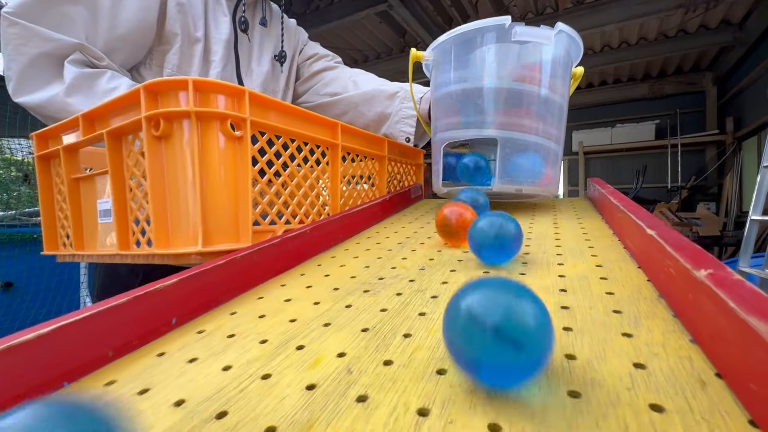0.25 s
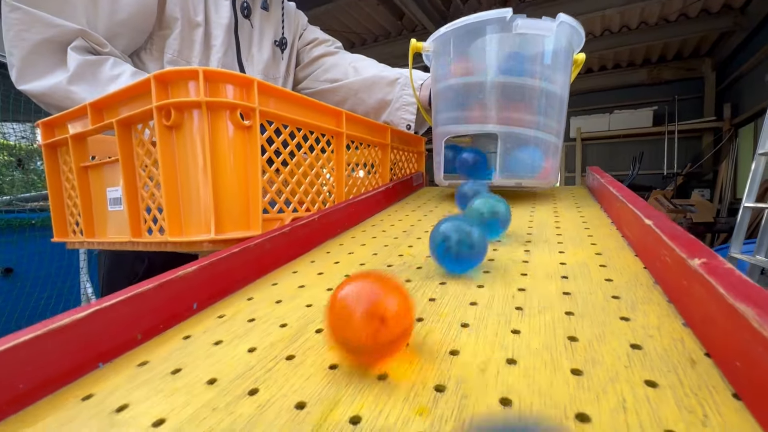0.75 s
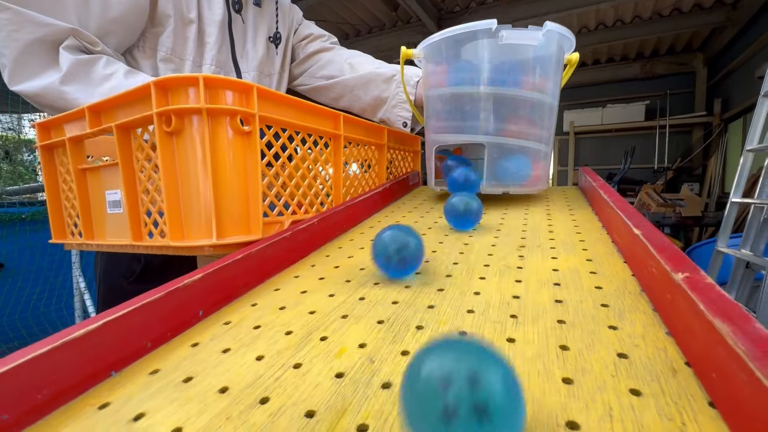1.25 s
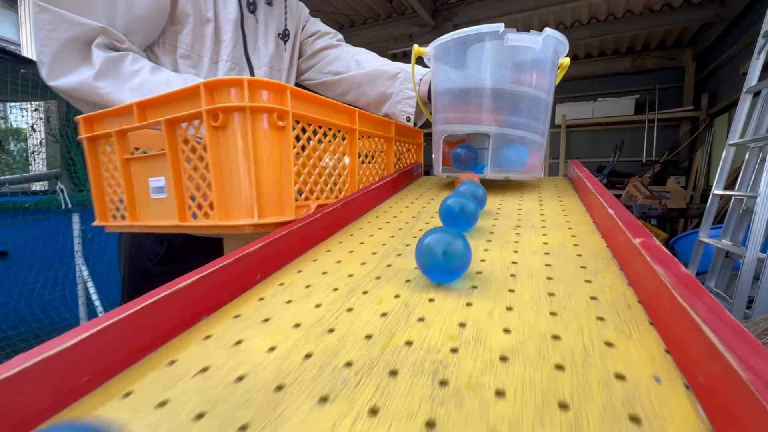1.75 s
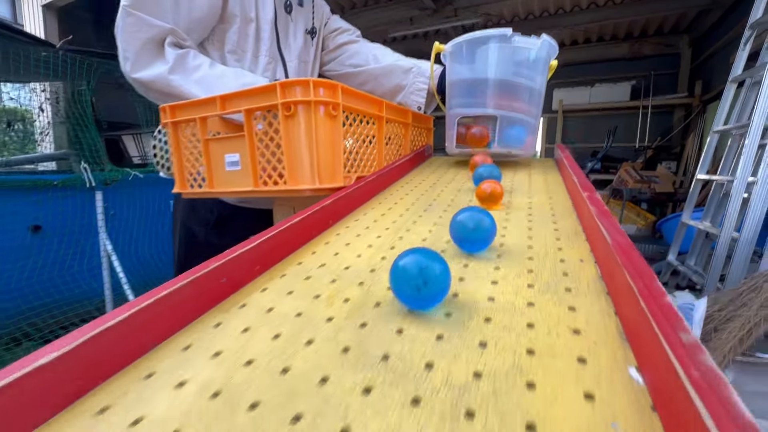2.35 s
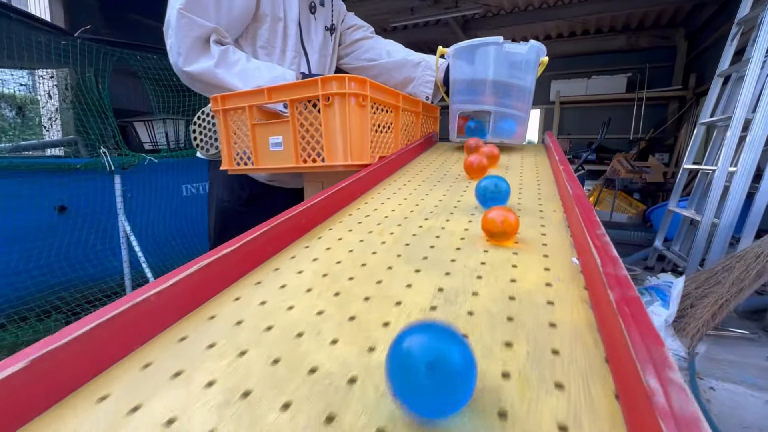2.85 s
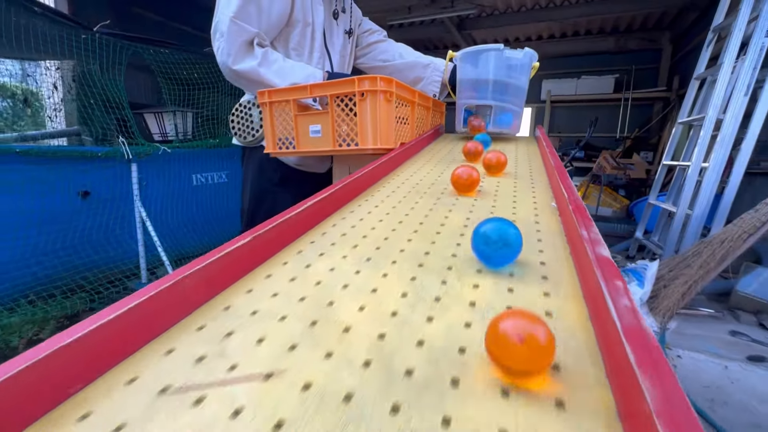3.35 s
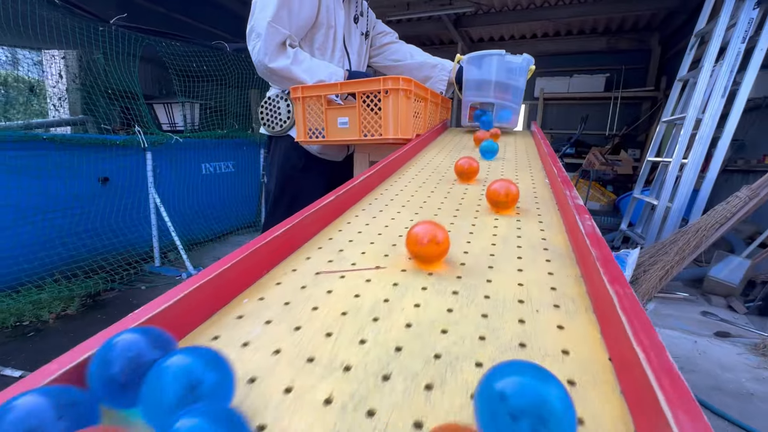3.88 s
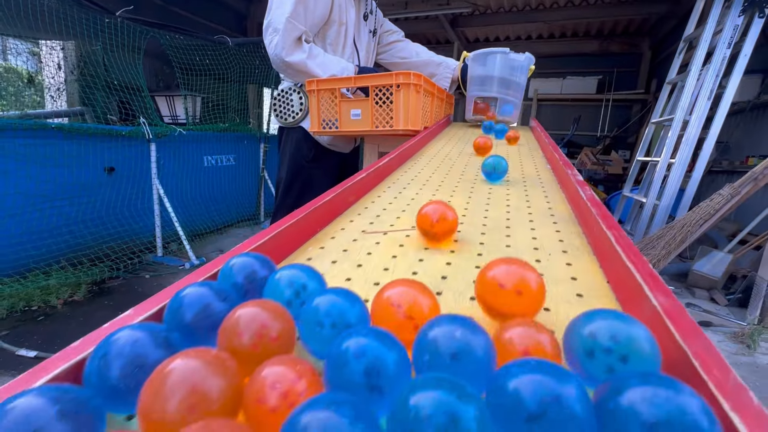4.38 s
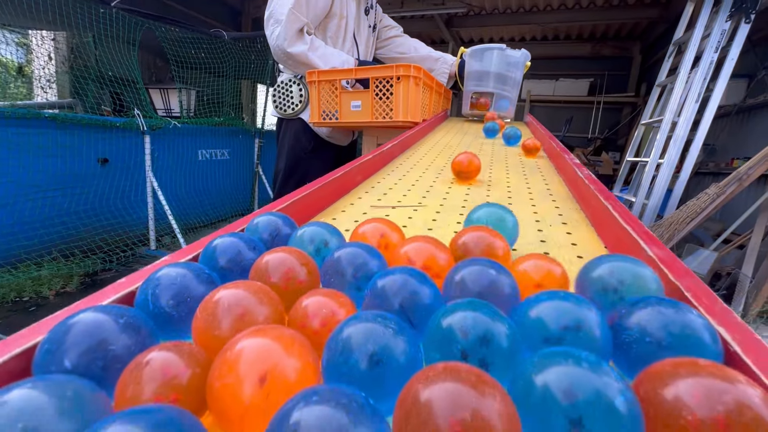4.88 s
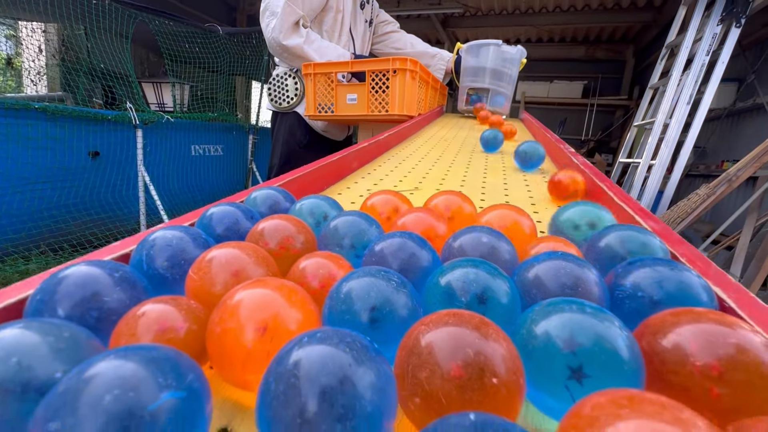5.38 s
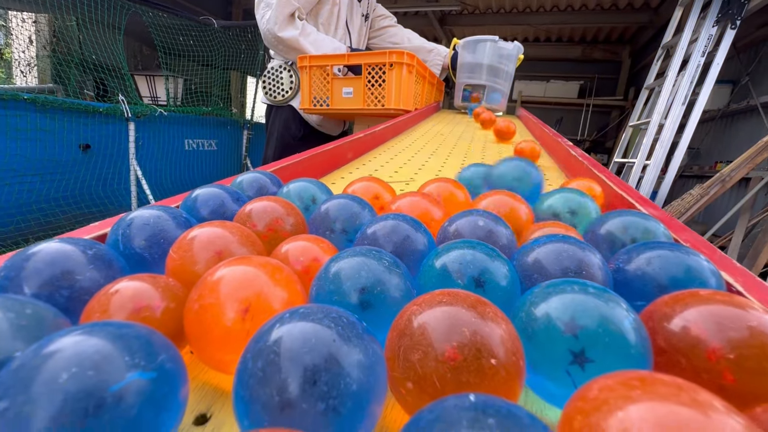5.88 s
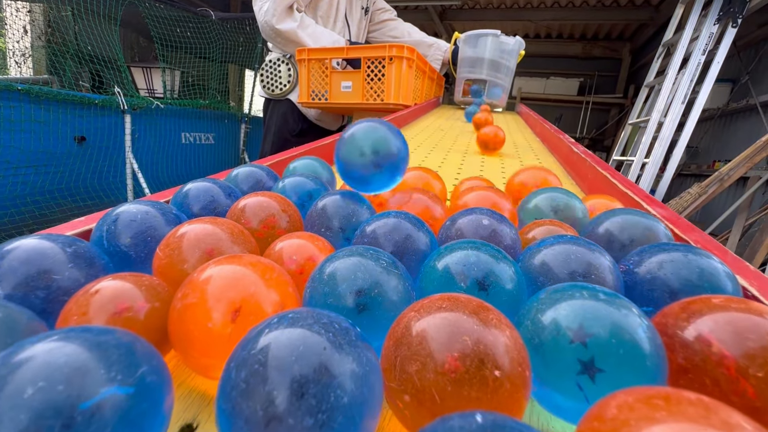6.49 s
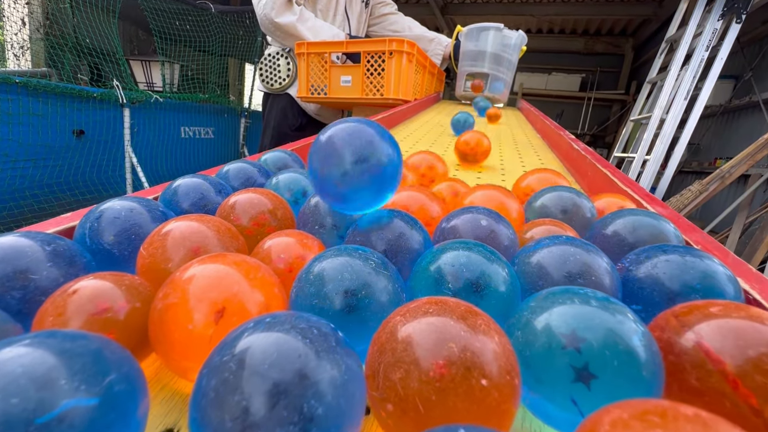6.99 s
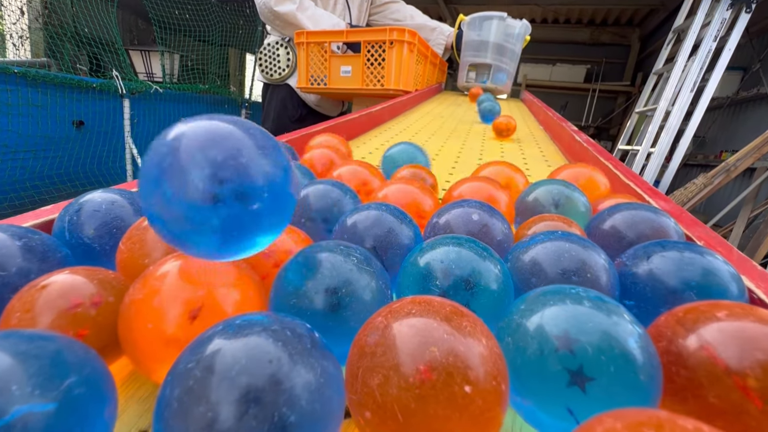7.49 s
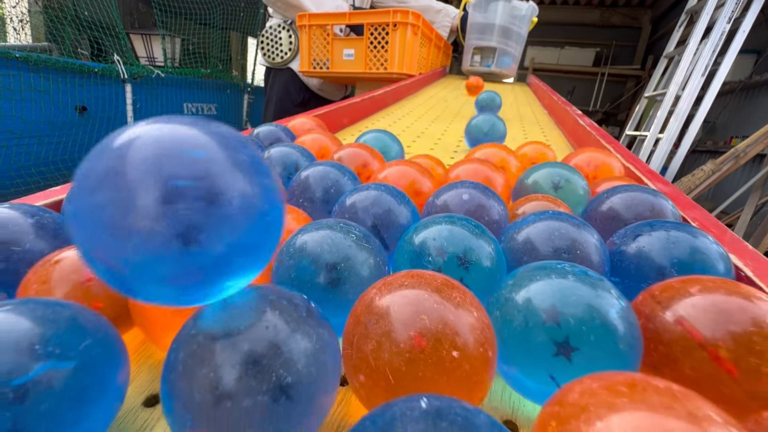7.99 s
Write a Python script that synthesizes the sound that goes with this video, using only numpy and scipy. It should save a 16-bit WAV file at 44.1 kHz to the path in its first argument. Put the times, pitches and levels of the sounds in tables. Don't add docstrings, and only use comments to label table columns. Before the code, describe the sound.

Close at the foot of a perforated wooden board in an open shed, hollow hard plastic balls roll down and collide. From 0 s, crisp cracks and hollow tocks burst out at about 0.04, 0.2 and 0.5 s over a low rumble, rattling roll and faint hiss. Until 3 s, separate sharp clacks and short chattering chains come irregularly, with brief gaps filled by rolling and light ticks; some ring high and thin, others knock low. From 3 to 4 s the pile closes in and the rumble fades back. Between 4 and 6 s, hits crowd together, fuller and woodier, with board thuds. Strong clusters continue around 6.1, 6.4 and 6.75 s, then spacing loosens through 7 to 8 s. Near 8.1 s a hard clack comes with a soft low bump on the microphone. Short, faint room reverberation; wide, uneven stereo; subdued top treble.

```python
import sys
import numpy as np
from scipy import signal
from scipy.fft import rfft, irfft, next_fast_len
from scipy.io import wavfile
from scipy.ndimage import uniform_filter1d, minimum_filter1d, map_coordinates

SR = 44100
rng = np.random.default_rng(int(sys.argv[2]) if len(sys.argv) > 2 else 0)


def inscribe(sig):
    pcm = np.round(np.clip(np.atleast_2d(sig).T, -1, 1) * 32767)
    wavfile.write(sys.argv[1], SR, pcm.astype(np.int16))


def level_to_linear(level):
    exponent = np.asarray(level, float) / 20
    return 10 ** exponent


N = 363384

# frequency in Hz, level in dB.
SURFACE = [(900, -12.5), (1700, -6), (3000, -15), (4100, -25), (5000, -31), (5700, -25.5), (6300, -31.5),
           (7200, -37.5), (8200, -36), (9400, -38.5), (10100, -72), (14000, -120)]
# frequency in Hz, left minus right in dB.
LEAN = [(25, 5.5), (150, 8.5), (400, 8.5), (980, -2.5), (1720, 0.5), (3000, 6.5), (5200, 2)]


def unit(x):
    return x / np.sqrt(np.mean(x ** 2) + 1e-20)


def along(points, hz):
    f, v = np.transpose(points)
    return np.interp(np.log(hz + 1), np.log(f + 1), v)


def filtered(x, response):
    m = next_fast_len(x.shape[-1] + 4096)
    spectrum = rfft(x, m) * response(np.fft.rfftfreq(m, 1 / SR))
    return irfft(spectrum, m)[..., :x.shape[-1]]


def resonance(f, hz, width_hz):
    return 1j * f * width_hz / (hz * hz - f * f + 1j * f * width_hz)


def modes(table):
    def response(f):
        return sum((-1) ** k * level_to_linear(db) * resonance(f, hz, width_hz)
                   for k, (hz, width_hz, db) in enumerate(table))
    return response


def causal(points):
    def response(f):
        cepstrum = irfft(np.log(level_to_linear(along(points, f)) + 1e-4))
        cepstrum[1:len(f) - 1] *= 2
        cepstrum[len(f):] = 0
        return np.exp(rfft(cepstrum))
    return response


def weighed(x, db):
    energy = np.sum(x ** 2, axis=(1, 2), keepdims=True) / 2 / SR
    return x / np.sqrt(energy) * level_to_linear(db)[:, None, None]


def laid(s, sounds):
    out = np.zeros((2, N + SR))
    for start, sound in zip(np.round(s * SR).astype(int), sounds):
        out[:, start:start + sound.shape[1]] += sound
    return out[:, :N]


def shaded(s):
    pile_near_s, pile_takes_s = 3.86, 0.22
    return 1 / (1 + np.exp((pile_near_s - s) / pile_takes_s))


def contacts():
    # start in seconds, clack energy in dB, shell pitch in Hz, chain length in ms.
    clean_hits = [(0.04, -30, 1136, 31), (0.21, -27.5, 557, 130), (0.254, -31.5, 1200, 13),
                  (0.371, -35.5, 520, 170), (0.7145, -29.5, 1980, 14), (1.031, -31, 610, 24),
                  (1.374, -46, 520, 33), (1.892, -37.5, 546, 8.7), (2.424, -31, 1410, 11),
                  (2.885, -44, 1570, 5.7), (2.896, -33, 1680, 23), (3.198, -39.5, 1320, 16),
                  (3.163, -35, 1760, 12), (6.364, -40, 450, 32), (6.462, -31, 697, 17),
                  (6.738, -28.5, 1020, 21), (6.831, -29.5, 966, 16), (7.329, -35.5, 1015, 10)]
    clean_shoves = [(0.466, -48.5, 710, 52), (0.506, -25.5, 694, 32), (1.145, -32.5, 1660, 5.6),
                    (1.165, -28.5, 1220, 3.5), (1.202, -43.5, 585, 15), (1.453, -40, 1360, 3.4),
                    (1.56, -31, 552, 22), (1.876, -40.5, 550, 11), (2.097, -32, 1500, 13),
                    (2.249, -32.5, 1450, 11), (2.349, -32, 930, 30), (2.502, -40, 546, 43),
                    (3.298, -35, 1740, 2.7), (3.302, -30.5, 1330, 5.4), (3.331, -33.5, 535, 21),
                    (5.673, -31, 1420, 10), (6.123, -25, 1110, 20), (7.165, -26.5, 1037, 15),
                    (7.445, -42.5, 460, 16), (7.938, -38.5, 487, 13), (8.193, -39, 540, 15)]
    pile_hits = [(0.586, -44, 974, 32), (0.752, -30, 585, 91), (0.95, -32, 1780, 11), (1.463, -39, 573, 43),
                 (1.684, -39.5, 535, 56), (1.827, -27.5, 1690, 14), (2.019, -36, 934, 47),
                 (2.115, -37, 1270, 29), (2.207, -32, 2040, 23), (2.829, -29.5, 1210, 23),
                 (3.609, -33, 1070, 16), (3.669, -35.5, 1780, 15), (3.722, -29, 964, 25),
                 (3.807, -35, 530, 12), (4.133, -26.5, 1000, 41), (4.227, -27, 1070, 31),
                 (4.363, -36.5, 993, 11), (5.1, -28, 1066, 22), (5.516, -30, 1540, 13),
                 (5.883, -27.5, 1060, 13), (6.393, -26, 1017, 42), (6.513, -29.5, 1550, 14),
                 (6.562, -31, 983, 25), (6.87, -30, 856, 40), (6.926, -33.5, 710, 19), (7.128, -30, 800, 9),
                 (7.501, -28.5, 940, 13), (7.696, -41.5, 550, 24), (8.1115, -29, 1090, 16)]
    pile_shoves = [(0.907, -36.5, 520, 49), (0.927, -47, 640, 26), (1.322, -32, 1185, 28),
                   (1.777, -31.5, 1205, 33), (2.076, -29, 1870, 13), (2.58, -34.5, 955, 27),
                   (3.127, -31, 1330, 30), (3.369, -44, 630, 10), (3.578, -40, 700, 7.1),
                   (3.758, -26, 1550, 25), (3.957, -30, 914, 11), (4.104, -41.5, 1070, 24),
                   (4.47, -24.5, 885, 20), (4.502, -28.5, 930, 17), (4.759, -26.5, 1006, 25),
                   (4.844, -28, 1265, 7.8), (4.981, -55, 503, 13), (5.248, -36, 943, 11),
                   (5.265, -32, 990, 15), (5.429, -27.5, 990, 15), (5.591, -36, 940, 14),
                   (5.65, -28, 1235, 15), (5.789, -28.5, 1140, 15), (5.826, -34.5, 1220, 22),
                   (5.94, -29.5, 994, 20), (6.237, -32.5, 940, 19), (6.53, -30, 1040, 18),
                   (7.092, -49, 505, 27), (7.562, -33, 1200, 23), (7.619, -39.5, 468, 17)]
    drops = [(0.173, -37, 563, 79), (0.311, -44, 537, 73), (0.432, -53, 480, 31), (1.088, -62, 577, 16),
             (1.221, -42.5, 500, 33), (2.913, -35, 1630, 12), (2.968, -40.5, 1130, 19),
             (3.42, -32.5, 1320, 24), (3.853, -48, 520, 15), (3.911, -34.5, 850, 11),
             (3.976, -38.5, 880, 7.8), (4.328, -26, 1070, 38), (4.543, -30, 1140, 18),
             (5.214, -31, 1420, 10), (5.617, -38, 935, 18), (5.905, -33, 767, 18), (6.05, -37, 762, 29),
             (6.207, -31, 1134, 12), (7.371, -31, 770, 12), (7.752, -33.5, 624, 15),
             (7.875, -35.5, 1010, 16)]
    settles = [(0.145, -42.5, 594, 13), (2.726, -41, 456, 24), (2.995, -49.5, 470, 47),
               (3.178, -43.5, 1480, 14), (3.218, -38, 1110, 29), (3.269, -38.5, 890, 30),
               (3.388, -41.5, 523, 57), (4.058, -57, 505, 43), (4.174, -29.5, 770, 23),
               (4.565, -32, 1105, 27), (4.624, -35, 1074, 16), (4.928, -34, 983, 31), (5.481, -37, 570, 14),
               (6.906, -34, 973, 6.7), (7.2, -31.5, 1100, 27), (7.298, -38.5, 467, 7.9),
               (7.523, -36, 1750, 13)]
    hit_rise, shove_rise = 0.17, 0.55
    clean_db, pile_db, drop_db = -7.5, -2, 2.5
    kinds = [(clean_hits, hit_rise, clean_db), (clean_shoves, shove_rise, clean_db),
             (pile_hits, hit_rise, pile_db), (pile_shoves, shove_rise, pile_db),
             (drops, hit_rise, drop_db), (settles, shove_rise, drop_db)]
    return np.transpose([(s, db, hz, thud_db, rise * ms * 1e-3, (1 - rise) * ms * 1e-3)
                         for table, rise, thud_db in kinds for s, db, hz, ms in table])


def chains(rise_s, fall_s, density, scatter_db):
    rise, fall = (np.clip(v, .0003, .04)[:, None, None] for v in (rise_s, fall_s))
    age = np.arange(SR // 8) / SR
    draw = rng.random((len(rise), 3, 2, SR // 8))
    main = np.abs(age - rise) <= .5 / SR
    force = level_to_linear(-scatter_db * np.log(draw[:, 1] + 1e-3)) * np.sign(draw[:, 2] - .5)
    before = 0.67 + 0.52 * (age / rise) ** 1.8
    after = np.exp(-np.abs((age - rise) / fall) ** 1.09)
    swell = np.where(age < rise, before, after)
    return swell * (force * (draw[:, 0] < density / SR) + 0.53 * main)


def arrivals():
    # frequency in Hz, width in Hz, level in dB.
    board_modes = [(81, 30, -13.5), (202.8, 101, -5.5), (330, 132.4, 4), (414, 169, 3)]
    pile_modes = [(520, 120, 3), (1070, 416, 8), (1740, 360, 3.5)]
    open_modes = [(520, 28, 7), (820, 480, -4.5), (1287, 97, -1), (2000, 3000, 4.5)]
    s, db, hz, thud_db, rise_s, fall_s = contacts()
    pitch = hz[:, None, None]
    near = shaded(s)[:, None, None]
    spread = np.clip((rise_s + fall_s) / .016, .15, 1)[:, None, None]
    lone_width, chain_width = .3, 0.71
    width = lone_width + (chain_width - lone_width) * spread

    def soft(f, corner_hz):
        return 1 / (1 + 1j * f / corner_hz) ** 4

    def ring(f, hz):
        return resonance(f, hz, width * hz) ** 2

    def shell(f):
        tock = soft(f, 2410) * (ring(f, pitch) - 0.24 * ring(f, 1.4 * pitch))
        hollows = near * modes(pile_modes)(f) + (1 - near) * modes(open_modes)(f)
        return 2.47 * tock + spread * soft(f, 1610) * hollows

    def board(f):
        return soft(f, 750) * modes(board_modes)(f)

    clack_chain = chains(rise_s, fall_s, 2000 * spread, scatter_db=2.5)
    thud_chain = chains(rise_s + 0.0014, 0.95 * fall_s, 500, scatter_db=1.0)
    tick_chain = chains(0.92 * rise_s, 1.2 * fall_s, 5400, scatter_db=4.0)
    clack = weighed(filtered(clack_chain, shell), db - 3.5)
    thud = weighed(filtered(thud_chain, board), db + thud_db - 8)
    tick = weighed(filtered(tick_chain, causal(SURFACE)), db - 25.0)
    return laid(s, clack + thud + tick)


def tocks():
    # time of the peak in seconds, peak in dB, pitch in Hz.
    strays = [
        (0.038, -12.5, 4620),
        (0.213, -18, 4800),
        (0.508, -11, 3410),
        (5.382, -26, 1460),
        (5.4416, -8, 900),
    ]
    shell_tocks = [(0.0394, -7.5, 3130), (0.0399, -9, 2280), (0.055, -21, 1600), (0.059, -16, 1180),
                   (0.214, -15, 2990), (0.22, -13.5, 980), (0.2182, -14, 3050), (0.227, -10, 1246),
                   (0.229, -11.5, 2300), (0.2296, -14.5, 1625), (0.259, -15, 1730), (0.2619, -12, 2225),
                   (0.2634, -9, 1360), (0.5093, -22, 1400), (0.509, -13, 2240), (0.52, -20, 1460),
                   (0.7169, -3, 1550), (0.717, -8.5, 2046), (0.723, -11, 884), (0.7548, -13, 2450),
                   (0.7596, -16, 2980), (0.7673, -7.5, 1240), (0.9532, -6.5, 1790), (1.0566, -9.5, 1330),
                   (1.1481, -5, 1710), (1.1688, -13, 2380), (1.1696, -1, 1320), (1.173, -17, 923),
                   (1.7797, -11.5, 1270), (1.7859, -8.5, 1370), (1.7909, -13, 1265), (2.0813, -8, 1995),
                   (2.087, -12, 890), (2.0883, -8, 1235), (2.088, -23, 1870), (2.103, -10.5, 1545),
                   (2.212, -7, 2055), (2.25, -8, 1230), (2.262, -15.5, 824), (2.2605, -4.5, 1930),
                   (2.429, -12, 1780), (2.836, -19, 1270), (2.842, -11.5, 1070), (2.902, -13.5, 1625),
                   (2.903, -12, 1910), (2.9179, -17.1, 2120), (3.1307, -12.5, 2380), (3.146, -31.5, 960),
                   (3.1454, -15.5, 1690), (3.1485, -9.5, 1325), (3.166, -11.5, 1810), (3.1833, -14, 1450),
                   (3.2057, -9.5, 1370), (3.3, -13, 2640), (3.3003, -8.5, 1750), (3.305, -12.5, 2690),
                   (3.3055, -4.5, 1356), (3.314, -12, 1290),
                   (3.3095, -8, 724), (3.4315, -11.5, 1390), (3.67, -10.5, 1850), (3.679, -12.5, 1050),
                  (3.735, -15, 1185), (3.773, -9, 1425), (3.779, -9.5, 900), (3.97, -14, 1190),
                  (4.1433, -10, 1740), (4.146, -10, 1030), (4.149, -8, 1400), (4.1862, -20.5, 990),
                  (4.2385, -4, 1060.0), (4.335, -7.5, 1105), (4.3397, -11.5, 1600), (4.345, -12.5, 1050),
                  (4.4765, -17, 1080), (4.543, -8.5, 1340), (4.5717, -8.5, 1057), (4.767, -13, 960),
                  (4.7725, -13.5, 1046), (4.8476, -16.5, 1620), (5.1059, -9, 1110), (5.112, -11, 820),
                  (5.2162, -10.5, 1620), (5.226, -22, 1410.0), (5.434, -15, 1520), (5.435, -18, 2200),
                  (5.4418, -6, 1240), (5.5197, -5, 1020), (5.5213, -6.5, 1795), (5.6505, -12.5, 1800),
                  (5.676, -11, 990), (5.6802, -14, 1640), (5.802, -12, 934), (5.8003, -12, 1780.0),
                  (5.8805, -9.5, 1365), (5.888, -8.5, 1620), (5.947, -9.5, 1263), (6.1275, -13, 1530),
                  (6.14, -13, 1165), (6.399, -22, 2490), (6.404, -10, 1230), (6.4064, -10.5, 726),
                  (6.4195, -9.5, 1360), (6.517, -9, 1046), (6.555, -13, 1040), (6.7511, -5, 1093),
                  (6.8355, -14.5, 1525), (6.835, -11, 1080), (7.213, -11.5, 1770), (7.501, -26.5, 950),
                  (7.5267, -20, 1770), (8.1143, -6, 1730), (8.115, -7, 1074)]
    thumps = [(0.043, -7, 518), (0.0569, -6, 605), (0.191, -15.5, 477), (0.216, -10, 520),
              (0.2614, -12, 696), (0.5188, -6, 530), (0.532, -24.5, 573), (0.7578, -11.5, 510),
              (0.7668, -10, 570), (1.0411, -9, 535), (1.1499, -7, 633), (1.332, -14, 540), (1.782, -9, 524),
              (2.0828, -17.5, 576), (2.224, -10, 775), (2.8425, -11, 690), (2.9029, -17, 760),
              (3.1389, -11, 510), (3.341, -16.5, 443), (4.1491, -7, 433), (4.1935, -10.5, 656),
              (4.3346, -12.5, 594), (4.3446, -14, 565), (4.5095, -8.5, 459), (4.5129, -13, 273),
              (4.5571, -17.5, 643), (4.7687, -12, 462), (4.856, -14, 430), (5.106, -11, 483),
              (5.2216, -15, 750), (6.1321, -9.5, 690), (6.4269, -14, 560), (6.581, -10.5, 640),
              (6.9138, -10, 630), (7.13, -14.5, 453), (7.1752, -11.5, 386), (7.3762, -12, 533),
              (7.5094, -10.5, 303), (7.7569, -16, 670), (7.756, -16.5, 265.5), (8.1166, -11, 634)]
    deep = [(0.22, -19.5, 263), (0.23, -26.5, 73.5), (0.76, -20.5, 60), (0.972, -17.5, 256),
            (2.848, -23.5, 82.6), (4.274, -14, 432), (4.336, -12, 267), (5.492, -21, 398),
            (5.801, -13.5, 264), (6.057, -15.5, 348), (6.13, -12.5, 408), (6.215, -13, 259),
            (6.243, -14.5, 420), (6.371, -15, 415), (6.412, -10, 232), (6.467, -17, 298), (6.546, -17, 287),
            (6.932, -13, 357), (7.135, -16.5, 256), (8.121, -17.5, 255)]
    s, db, hz = np.transpose(strays + shell_tocks + thumps + deep)
    low = np.arange(len(s)) >= len(s) - len(thumps + deep)
    rise_s = np.where(low, 1.865, 2.898) / hz
    peak = level_to_linear(db + np.where(low, -1, -0.5))[:, None]
    t = np.arange(SR // 6) / SR
    u = t / rise_s[:, None]
    swell = peak * (u * np.exp(1 - u)) ** 2
    start, hand = rng.random((len(s), 2, 1)).transpose(1, 0, 2)
    turn = 2 * np.pi * (hz[:, None] * t + start)
    lean = level_to_linear(along(LEAN, hz) / 2)[:, None]
    left = lean * swell * np.sin(turn)
    right = np.sign(hand - .5) * swell * np.cos(turn) / lean
    return laid(s - rise_s, np.stack([left, right], axis=1))


def cracks():
    # start in seconds, crack level in dB.
    square = [(0.0376, -14), (0.2102, -12.5), (0.258, -27), (0.5053, -13), (0.6746, -27.5), (0.753, -16.5),
              (1.033, -21.5), (1.318, -27), (1.5535, -29), (1.7728, -19.5), (2.347, -23.5), (2.5805, -27.5),
              (2.824, -24), (3.129, -26.5), (3.301, -21), (3.419, -23.5), (3.9546, -29.5), (4.324, -21.5),
              (4.765, -29.5), (5.0942, -25), (5.4377, -24), (5.65, -45.5), (5.795, -24), (6.129, -25.5),
              (6.3963, -18.5), (6.7401, -28.5), (7.166, -25.5)]
    # start in seconds, crack level in dB.
    glancing = [(0.182, -29), (0.31, -26), (0.383, -28.5), (1.166, -44.5), (1.822, -39.5), (2.0769, -23),
                (2.2116, -36.5), (3.61, -41.5), (3.6661, -31.5), (3.722, -30), (3.759, -23), (4.229, -31),
                (4.848, -33), (5.879, -30), (6.2058, -36), (7.13, -48), (7.497, -33.5), (7.57, -39),
                (7.878, -36), (8.1088, -29), (8.195, -39.5)]
    # start in seconds, peak in dB.
    touches = [(0.08, -38), (0.625, -48), (0.787, -43.5), (1.38, -50), (1.4167, -47.5), (1.638, -46.5),
               (1.6703, -42), (1.9066, -39), (2.1123, -46.5), (2.146, -42.5), (2.411, -47), (4.14, -43),
               (4.5406, -44), (4.642, -48.5), (5.2658, -49.5), (5.9414, -51.5), (8.112, -35)]
    touch_db = 7.5
    s, db = np.transpose(square + glancing + [(s, db + touch_db) for s, db in touches])
    top_db = np.repeat([-22, -17, -10], [len(square), len(glancing), len(touches)])
    split_hz = 5700
    colour, alike = causal(SURFACE), np.ones(len(s))
    body_chain = chains(0.0025 * alike, 0.0077 * alike, 6000, scatter_db=-3.0)
    top_chain = chains(0.0014 * alike, 0.0039 * alike, 12000, scatter_db=-18.5)
    body = filtered(body_chain, lambda f: colour(f) * (f < split_hz))
    top = filtered(top_chain, lambda f: colour(f) * (f > split_hz))
    return laid(s, weighed(body, db - 21.0) + weighed(top, db + top_db - 23.5))


def bump():
    # peak in dB, frequency in Hz, width in Hz.
    swing = (-14.5, 46, 22)
    db, hz, width_hz = swing
    t = np.clip(np.arange(N) / SR - 8.114, 0, 1)
    onset = 1 - np.exp(-t / 0.013)
    return level_to_linear(db) * np.sin(2 * np.pi * hz * t) * np.exp(-np.pi * width_hz * t) * onset


def bumps(rate, scatter_db, spectrum):
    struck = rng.random((2, N)) < rate / SR
    force = level_to_linear(scatter_db * rng.exponential(size=(2, N))) * rng.standard_normal((2, N))
    return unit(filtered(struck * force, causal(spectrum)))


def rolling():
    # time in seconds, level in dB.
    traffic = [(0.0, -29.5), (0.85, -29.5), (1.26, -32.5), (2.2, -30), (2.61, -35), (3.23, -29.5),
               (4.04, -31), (4.31, -27), (5.23, -34.5), (5.83, -30), (6.3, -36), (6.7, -32), (7.05, -40.5),
               (7.37, -31.5), (7.87, -46), (8.24, -33)]
    # frequency in Hz, level in dB per Hz.
    rumble_colour = [(13, -34.5), (22, -14), (70, 0), (260, -0.5), (340, -31), (570, -120)]
    rattle_colour = [(88, -50.5), (150, -16.5), (295, 2), (487, 4.5), (650, -0.5), (728, 4), (846, -4.5),
                     (1250, -4), (1690, -18), (3000, -57), (6600, -120)]
    t = np.arange(N) / SR
    shade = shaded(t)
    rattle_db = np.interp(t, *np.transpose(traffic))
    rumble_db = rattle_db + 2 - 1.5 * t - 10 * shade
    hiss_db = -40 + 0.063 * (rattle_db - rattle_db[0]) - 1.88 * t + 1.5 * shade
    lurch = map_coordinates(rng.standard_normal(300), [np.arange(N) * 30 / SR])
    rumble = level_to_linear(rumble_db + 2.3 * lurch) * bumps(600, 0.26, rumble_colour)
    rattle = level_to_linear(rattle_db + 2.5 * lurch) * bumps(2500, 0.88, rattle_colour)
    hiss = level_to_linear(hiss_db + 2 * lurch) * bumps(2500, 1.98, SURFACE)
    return rumble + rattle + hiss


def shed(x):
    # frequency in Hz, 60 dB decay time in seconds.
    decay = [(150, 0.45), (1000, 0.23), (3000, 0.081), (8000, 0.024)]
    hz, t, z = signal.stft(rng.standard_normal((2, SR // 2)), SR, nperseg=256)
    tail = signal.istft(z * level_to_linear(-60 * t / along(decay, hz)[:, None]), SR, nperseg=256)[1]
    late = np.pad(x, ((0, 0), (300, 0)))
    return signal.fftconvolve(late, tail / np.linalg.norm(tail[0]), axes=1)[:, :N]


def ports(pair):
    # frequency in Hz, coherence 0-1.
    likeness = [(40, .85), (150, .4), (500, .3), (1500, .45), (4200, .45), (4900, .7), (5350, .99),
                (7600, .99), (9000, .96)]
    # frequency in Hz, lead of the left in radians.
    lead = [(0, 0), (300, -1.5), (1350, 6.8), (4200, 27), (5000, 23.9), (5400, 22.2), (6100, 21.7),
            (6900, 19.1), (7550, 18.6), (8400, 15.9), (9600, 15.4)]

    def share(f):
        turn = np.arccos(np.clip(along(likeness, f), 0, 1)) / 2
        return np.array([np.cos(turn), np.sin(turn)])

    def skew(f):
        half = level_to_linear(along(LEAN, f) / 2) * np.exp(.5j * np.interp(f, *np.transpose(lead)))
        return np.array([half, 1 / half])

    mid, side = filtered(pair, share)
    return filtered(np.array([mid + side, mid - side]), skew)


def scene():
    knocks, bed = arrivals() + cracks(), rolling()
    single = tocks()
    answer = level_to_linear(-15.0) * shed(knocks + level_to_linear(-5) * single)
    nudge = bump() * [[1], [0]]
    return single + ports(knocks + answer + bed + nudge)


def top_cut(x):
    return signal.sosfilt(signal.butter(12, 9790, fs=SR, output="sos"), x)


def record(dry):
    need = np.minimum(1, .93 / (np.abs(dry).max(axis=0) + 1e-9))
    gain = uniform_filter1d(minimum_filter1d(need, size=265), size=131)
    return top_cut(dry * gain)


dry = scene()
out = record(dry)
inscribe(out)
```